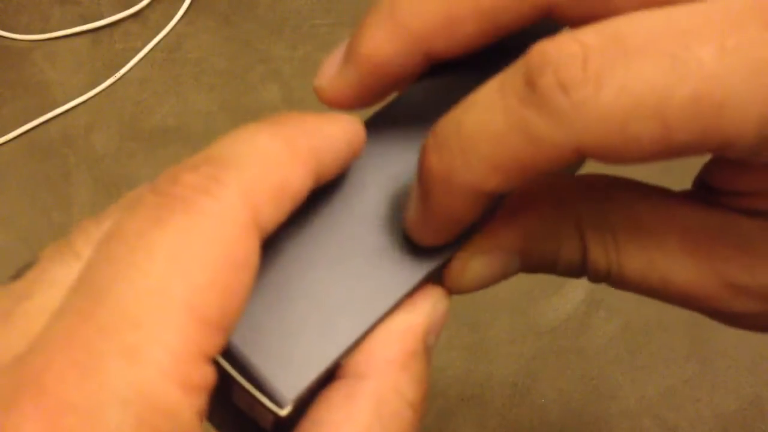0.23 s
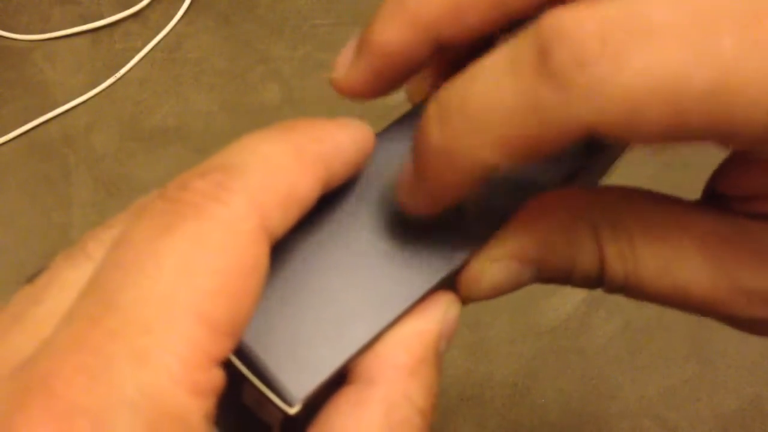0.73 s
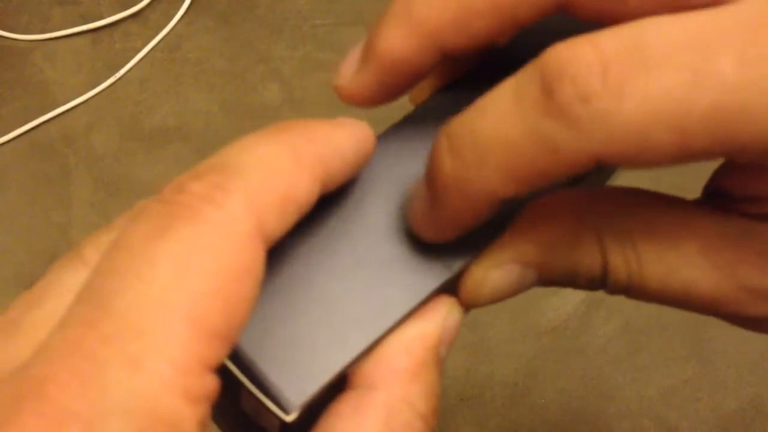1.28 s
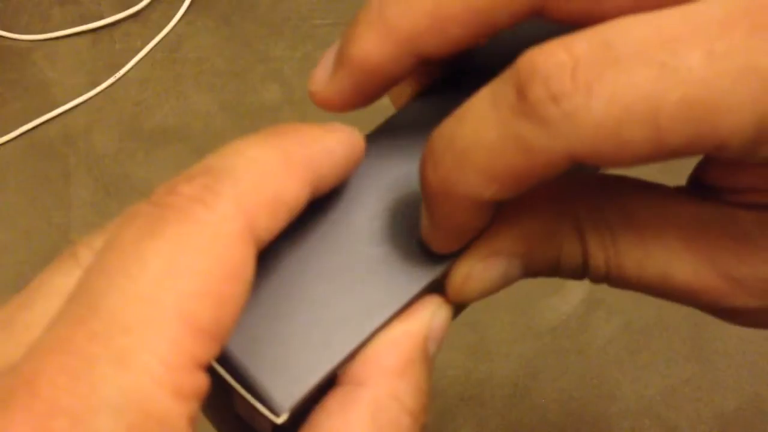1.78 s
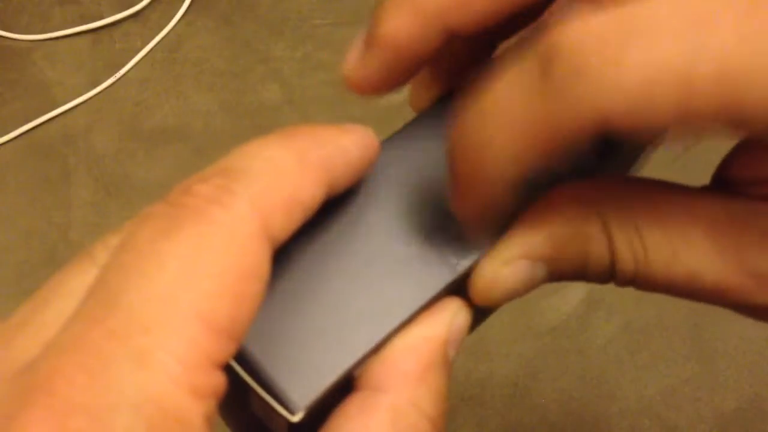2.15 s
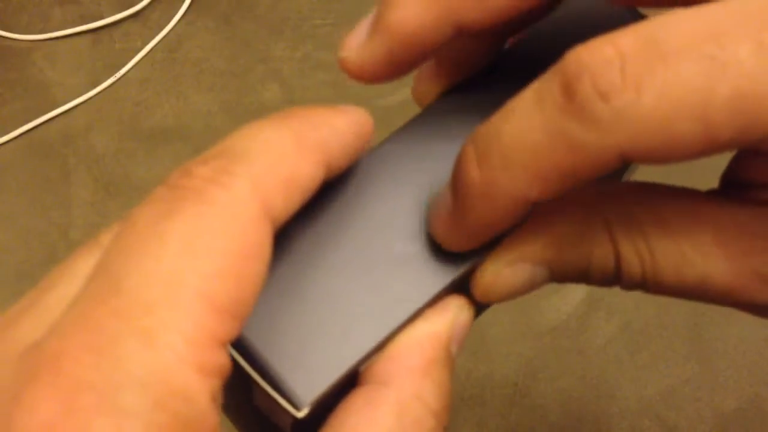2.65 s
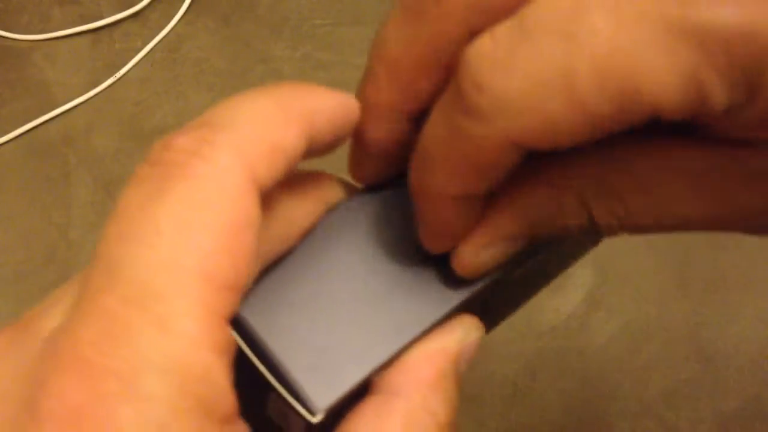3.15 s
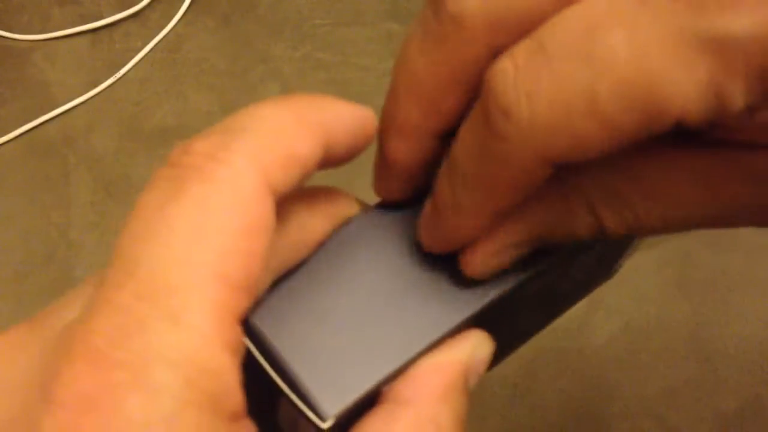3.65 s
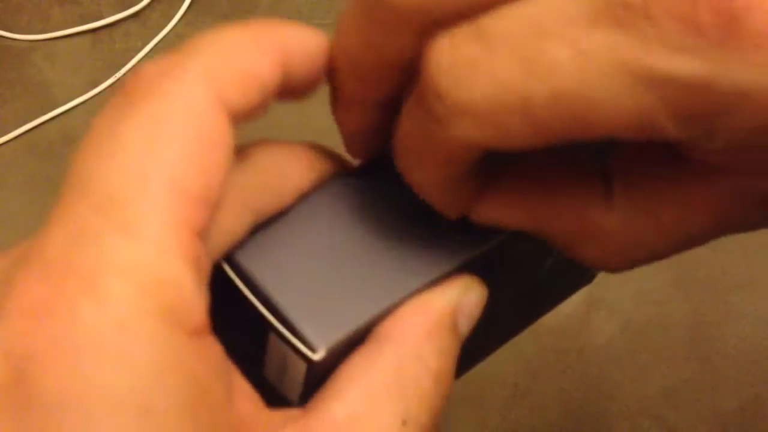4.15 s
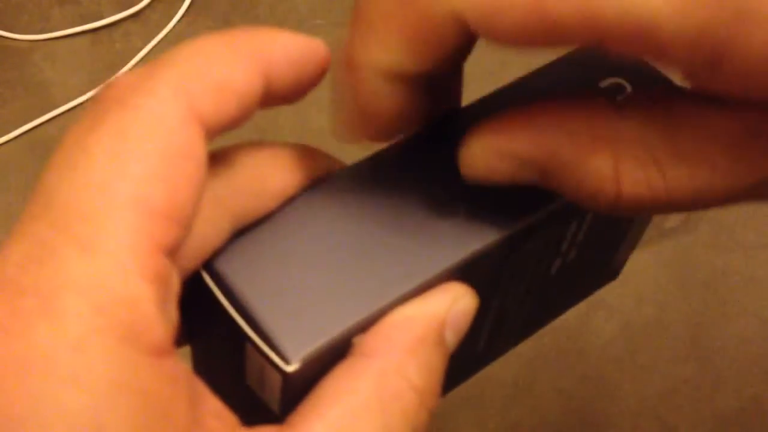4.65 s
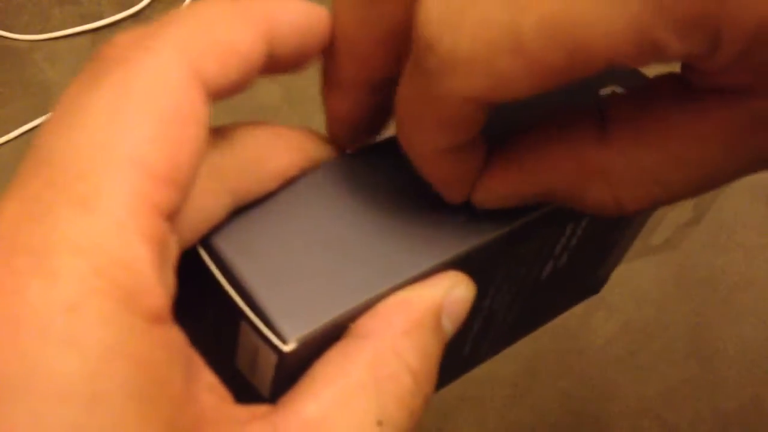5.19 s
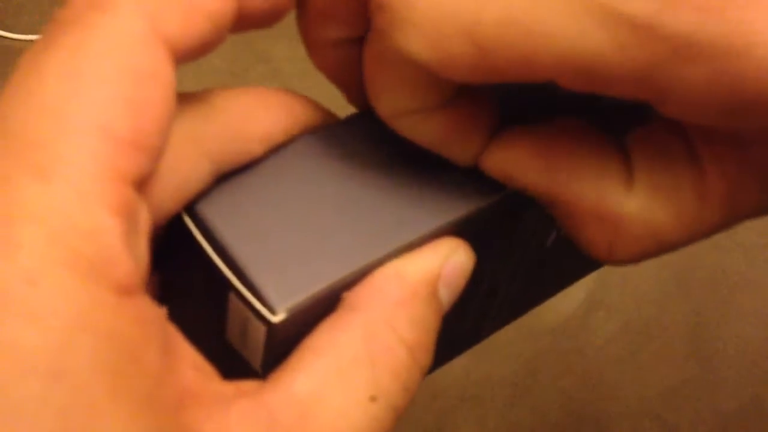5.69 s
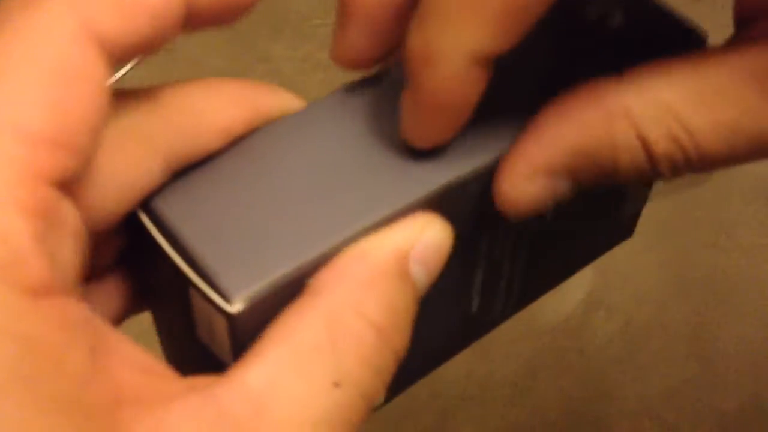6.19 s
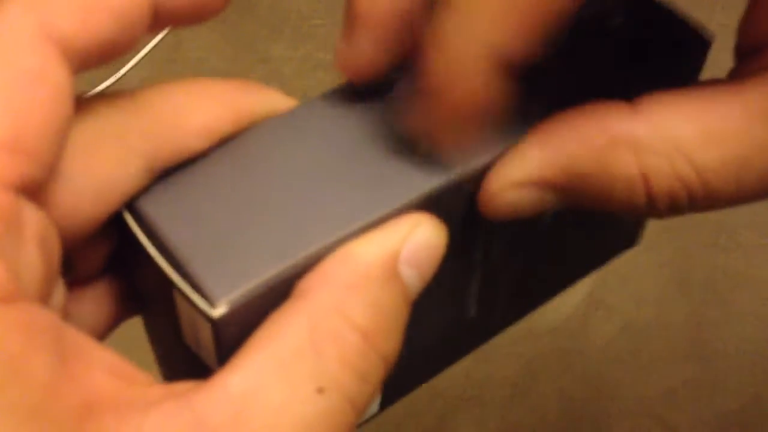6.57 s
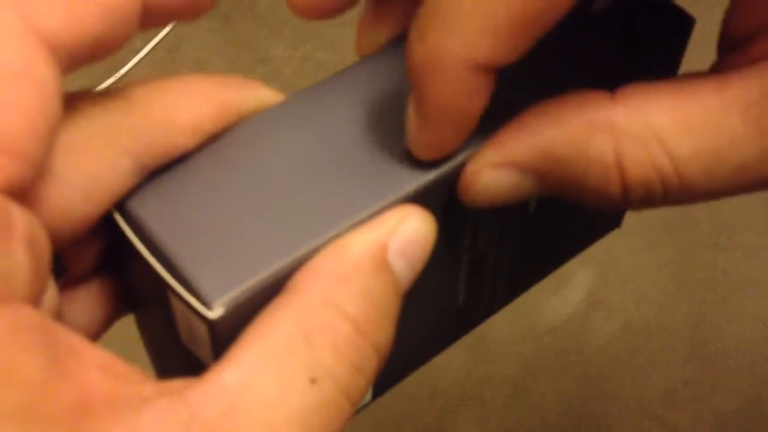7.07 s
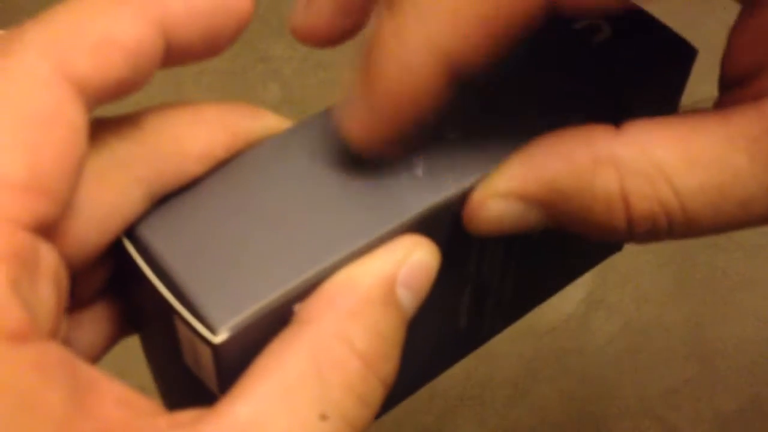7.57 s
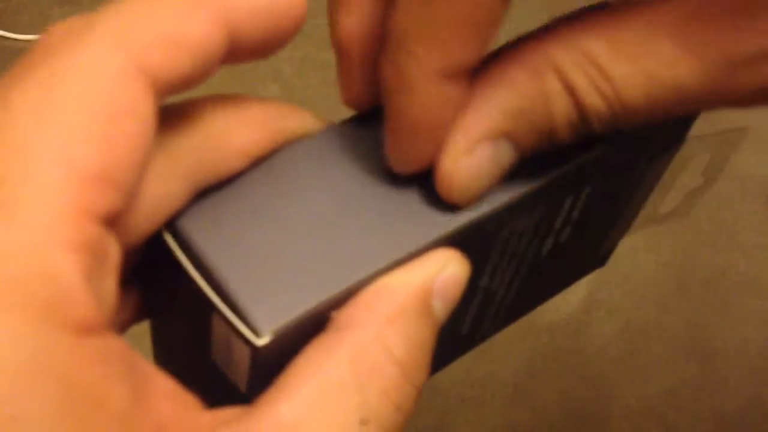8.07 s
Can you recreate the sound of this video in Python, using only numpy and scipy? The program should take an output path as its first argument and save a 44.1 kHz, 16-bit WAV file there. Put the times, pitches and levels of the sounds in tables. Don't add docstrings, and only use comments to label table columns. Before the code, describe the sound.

A close, dry indoor take of fingernails working at tape on a small cardboard box, over a steady soft hush. A few faint ticks open, then at 0.5 s a very loud, sharp snap with a short hollow card ring and slight room tail. Light scrapes lead to a weaker snap near 1.0 s, more scratches and ticks, and a firm, looser-sounding snap at 2.0 s with a dull bump. From 2.3 to 6 s it stays quiet: short raspy nail strokes, tiny clicks, a bright tick around 3.1 s, low rumbles of the palm near 3.5 to 4 s, and barely noticeable picks at 4.7 and 6.0 s. A strong double-hit snap comes at 6.4 s, followed by quick scratches and crisp ticks to 6.8 s. Another very loud crack hits at 7.3 s; the hush then dips slightly, with sparse faint scrapes until the end at 8.3 s.

```python
import sys
import numpy as np
from scipy import signal
from scipy.io import wavfile
from scipy.ndimage import uniform_filter1d

SR = 44100
rng = np.random.default_rng(int(sys.argv[2]) if len(sys.argv) > 2 else 0)


def rack_gain(trim_db):
    fader = np.asarray(trim_db, float)
    return 10 ** (fader / 20)


def transcribe(signal):
    frames = np.atleast_2d(signal).T
    limited = np.clip(frames, -1, 1)
    pcm = np.round(limited * 32767).astype(np.int16)
    wavfile.write(sys.argv[1], SR, pcm)


N = 367794

# (frequency [Hz], density [dB per Hz])
HUSH_SPECTRUM = [(18, -67.5), (30, -30), (59, -19.5), (143, 0), (216, 2), (552, -6.5), (928, -6.5),
                 (1170, -11.5), (1410, -9.5), (2250, -14.5), (3320, -10), (4900, -18), (7060, -16.5),
                 (10400, -26.5), (15000, -18.5)]
# (time [s], level [dB])
HUSH_LEVEL = [(0, 3), (2, 2), (4, 2.5), (7.278, 3.5), (7.4, -3), (7.9, -1.5), (8.34, 0)]
# (frequency [Hz], gain [dB])
MIC_RESPONSE = [(60, -40), (150, -14.5), (300, -4), (4200, 1.5), (4700, -7.5), (5050, -21), (5500, -3),
                (6100, 2), (15000, -1.5)]
# (frequency [Hz], t60 [s], level [dB])
ROOM_DECAY = [(150, 0.5, 6), (390.3, 0.24, 5), (990, 0.56, 0), (2670, 0.48, 8), (3944, 0.48, -1),
              (7000, 0.82, -8.5), (12000, 0.4, -10.5)]

# (time [s], skin motion [dB])
HAND_MOTION = [(0.0, -65), (0.5, -71), (0.79, -69.5), (1.44, -68.5), (1.9, -74.5), (2.25, -69),
               (2.8, -73.5), (3.39, -76.5), (3.9, -66.5), (4.32, -69), (4.8, -86), (5.25, -64.5),
               (5.95, -78), (6.55, -60), (7.0, -83), (7.45, -70), (7.83, -82), (8.34, -66.5)]
# (middle [s], length [s], deep rumble [dB], hollow rumble [dB])
PALM_SQUEEZES = [(0.0, 1, -85, -64.5), (1.412, 0.97, -68.5, -65.5), (2.048, 0.41, -81, -73),
                 (3.443, 0.77, -56.5, -69), (3.9, 0.89, -57.5, -90), (4.28, 0.74, -66, -65),
                 (5.438, 0.11, -63, -55.5), (6.24, 0.43, -83, -65), (6.625, 0.46, -80.5, -70.5),
                 (7.849, 0.84, -62.5, -94.5), (8.25, 0.99, -84, -71)]
# (time [s], peak [dB], frequency [Hz])
DULL_BUMPS = [(0.572, -20.5, 382), (2.021, -22.5, 378), (2.73, -39, 228), (2.732, -47.5, 520),
              (2.733, -47.5, 794), (5.423, -37, 300), (5.467, -48, 300), (6.18, -36, 210),
              (5.445, -41, 330), (6.393, -26, 420), (6.392, -18.5, 240), (7.74, -46, 453),
              (7.767, -41.5, 281)]
# (frequency [Hz], width [Hz], level [dB])
HOLLOW_RUMBLE = [(250, 260, 4.5), (368, 240, -2.5)]
DEEP_RUMBLE = [(149, 41, -3.5), (188, 40, -1.5)]
SKIN_RUB = [(360, 67, -1), (860, 430, 1), (1430, 460, -5.5), (1830, 400, -5)]

# (start [s], length [s], card [dB], nail hiss [dB])
EDGE_SCRAPES = [(0.04, 0.03, -56.5, -67.5), (0.64, 0.032, -72, -62), (0.872, 0.043, -61, -66.5),
                (0.984, 0.044, -59.5, -55), (1.111, 0.028, -61, -55), (2.01, 0.065, -62.5, -62.5),
                (2.317, 0.064, -73.5, -78), (2.404, 0.064, -73.5, -75.5), (2.851, 0.085, -73.5, -67.5),
                (3.262, 0.067, -65, -63.5), (3.396, 0.042, -79, -68), (3.444, 0.084, -76.5, -68.5),
                (3.537, 0.062, -68.5, -64.5), (3.592, 0.049, -67.5, -71), (3.76, 0.041, -61, -74),
                (3.817, 0.076, -67, -76), (3.952, 0.091, -73.5, -73.5), (4.037, 0.11, -74, -77),
                (4.761, 0.048, -70, -71), (4.828, 0.024, -71, -77), (4.906, 0.025, -70, -68),
                (4.985, 0.072, -61.5, -69.5), (6.172, 0.059, -58.5, -68.5), (6.393, 0.028, -58, -52),
                (7.32, 0.039, -58, -57), (7.74, 0.026, -70, -65.5), (7.987, 0.097, -68.5, -70.5)]
# (start [s], length [s], card [dB], nail hiss [dB])
WALL_SCRAPES = [(0.643, 0.028, -60, -61), (0.925, 0.023, -61, -69), (1.259, 0.022, -62, -71),
                (1.303, 0.052, -64, -76.5), (1.412, 0.011, -62, -76), (2.109, 0.042, -57.5, -60.5),
                (2.723, 0.031, -72.5, -64), (4.222, 0.025, -68.5, -81), (4.364, 0.042, -69, -76),
                (4.729, 0.0044, -60, -60.5), (4.96, 0.019, -60, -68.5), (5.148, 0.13, -69.5, -79),
                (5.421, 0.03, -64, -71.5), (6.028, 0.017, -61.5, -74), (6.4, 0.028, -54.5, -72),
                (6.432, 0.037, -54.5, -63.5), (6.478, .04, -63, -75), (3.77, 0.08, -70, -81),
                (2.03, .07, -59, -73.5), (2.17, .1, -71, -85), (6.548, 0.037, -58, -54.5),
                (6.765, 0.067, -71, -75), (7.422, 0.021, -58.5, -59.5), (7.594, 0.16, -70, -81.5),
                (8.258, 0.032, -64, -76.5)]
# (start [s], length [s], corner [dB], slick [dB])
FOLD_SCRAPES = [(0.87, .04, -68, -81), (1.128, 0.02, -62, -73), (3.29, 0.049, -84, -61.5),
                (3.395, .03, -79, -71.5), (3.455, 0.028, -78, -69), (3.75, 0.04, -60, -80),
                (3.818, 0.041, -65, -84), (4.83, 0.018, -71, -84), (4.91, 0.028, -69, -78),
                (4.96, 0.033, -68, -83), (5.008, 0.037, -58.5, -70), (5.058, 0.018, -73, -82),
                (2.856, 0.054, -76, -68.5), (3.546, 0.055, -69, -78), (3.256, 0.053, -65.5, -83),
                (6.182, 0.059, -65, -80)]
# (start [s], length [s], level [dB])
RIDGE_SCRAPES = [(0.989, .03, -54), (1.11, 0.025, -65), (3.255, 0.096, -68), (3.46, .03, -74),
                 (3.52, 0.1, -63), (3.823, .04, -69), (3.965, .09, -75), (4.762, .04, -72),
                 (4.906, .03, -64), (6.165, 0.064, -65), (6.556, 0.023, -59), (7.737, 0.028, -71)]
# (frequency [Hz], level [dB])
NAIL_HISS = [(2650, -42.5), (4500, -7.5), (5070, -17), (5830, -12), (6950, -0.5), (7550, -7), (8590, -7.5),
             (10600, -16), (11500, -26), (15500, -32.5)]
# (frequency [Hz], width [Hz], level [dB])
EDGE_RASP = [(2072, 170, 0.5), (2582, 320, 0), (3290, 290, 3), (3750, 240, -0.5)]
WALL_SCRATCH = [(420, 170, -10), (850, 220, 1), (1470, 330, 0), (1770, 300, -10)]
CORNER_MODES = [(1440, 180, -3.5), (2540, 160, -17), (3877, 174, 13.5)]
SLICK_MODES = [(7970, 350, -2.2), (9280, 1500, -5)]
RIDGE_MODES = [(6800, 280, -7), (7300, 250, -2)]
SIZZLE_MODES = [(11800, 3400, 0)]

# (time [s], peak [dB], nail brightness [dB], walls [dB], lower edge mode [dB])
TICK_EVENTS = [(0.041, -45, -8.5, -30, 2), (0.172, -39, -17, -8.5, 1), (0.427, -44, -25, -1, -4),
               (0.574, -42, -5, -30, -6), (0.781, -43, -22, -9, -1), (0.925, -47.5, -12, -2, -2),
               (0.966, -28, -20, -2, -8), (1.0, -36, -3, -25, -6), (1.226, -38, -20, -14.5, -3),
               (1.411, -43, -22, -11.5, 1), (1.79, -49.5, -20, -12.5, -6), (2.323, -44, -10, -3, -2),
               (2.732, -42.5, -3, -10, -3), (3.099, -37, 8, -43.5, -3), (3.394, -52, -8, -25, -4),
               (3.765, -40.5, -8, -22, -8), (3.905, -50, 0, -30, -4), (4.229, -49.5, -29, -18, 3),
               (4.289, -52, -3, -28, -6), (4.38, -52, -25, -18, -4), (4.727, -55, -9, -28, 0),
               (4.805, -47.5, -19, -14, -8), (4.886, -43, -23, -10.5, 0), (4.964, -55, -14, -22, -2),
               (5.085, -46, -27, -6, 0), (5.419, -46, -13, -6, -10.5), (6.034, -53, -16, -8.5, -2),
               (6.173, -39.5, -27, -2, -4), (6.447, -44, -10, -14, 0), (6.56, -34, -26, -2, 1),
               (6.576, -47, -26, -2, -6), (6.578, -30, -11, -25, -12), (6.679, -36.5, -21, -10, 0),
               (6.623, -59, 0, -37, -2), (6.816, -53, -3, -18, -1), (7.326, -29, -17, -9, -2),
               (7.6, -49, -15, -5, 1), (7.918, -56, 3.5, -13, -2.5)]
# (frequency [Hz], t60 [s], level [dB])
EDGE_MODES = [(2692, 0.0069, -2.5), (3140, 0.022, 0.5), (3883, 0.0053, -13)]
NAIL_MODES = [(5930, 0.0012, -1.5), (6830, 0.026, 3), (7944, 0.016, -10), (9700, .003, -21.5),
              (13500, .002, -12.5), (15190, 0.0016, -13.5)]
WALL_MODES = [(905, 0.01, 7.5), (1140, 0.0026, -3.5), (1442, 0.0033, -4)]
HOLLOW_MODES = [(330, 0.023, -7.5), (467, 0.034, 2)]

SNAP_TIMES = [.5314, .9764, 1.9952, 6.3864, 7.2841, 4.7291, 6.0208]
# (peak [dB], rebound delay [ms], rebound [dB], slow ring [dB], room [dB])
SNAP_BLOWS = [
    (1.5, 1.37, -13.5, 2, -16),
    (-14.5, 1.37, -6, 6, -15),
    (-4.5, 0.731, -8.5, 13.5, -20),
    (-8.5, 0.5, 10.5, -6, -11.5),
    (1, 2.9, -15.5, -0.5, -15.5),
    (-35, 1.12, -7.5, 0, -16),
    (-33, 1.94, -1, 7, -14),
]
SNAP_RISES = [.15, .2, .6, .45, .15, .8, .6]
SNAP_DAMPING = [1.3, 1.5, 1.56, 1.5, 1.5, 1.3, 1.1]
# (delay [ms], level [dB])
SECOND_REBOUNDS = [(2.3, -20.5), (2.7, -34), (2.4, -19), (3.0, -9), (2.5, -19), (3.1, -18), (4.3, -18)]
HAND_SHADE = [-1.2, -16, -18, -0.5, -3, -3.5, -2]
ECHO_SHARE = [-0.5, -1.5, 0, 10.5, -4, -13, 6]
RING_TO_ROOM = [-20, -14, -5, -14, -16.5, -14, -12]
# (delay [ms], level [dB])
NEAR_ECHOES = [(2.4, -6), (4.1, -10.5), (6.3, -16), (9.6, -22.5), (11.4, -20.5)]
# (frequency [Hz], width [Hz], level [dB])
FIRM_GRIP = [(382, 65, 2.5), (870, 190, 3.5), (1547, 200, 1), (2150, 200, -12.5), (1150, 330, -5.5),
             (3100, 290, -0.5), (3480, 120, -9), (6440, 150, -13), (6850, 150, -9.5), (7060, 220, -3.5),
             (8000, 200, -13.5), (9100, 150, -13), (9900, 240, -23.5), (12900, 300, -41)]
LIGHT_GRIP = [(390, 94, 17), (920, 185, 18.5), (1590, 260, -38), (3130, 34, 8), (3720, 42, -1),
              (7120, 130, -2), (7530, 500, 2), (9180, 110, -27), (9490, 110, -27), (13700, 280, -28)]
LOOSE_GRIP = [(436.5, 87.6, 7.5), (807, 140, 5.5), (974, 160, 2), (1480, 300, 1.5), (2173, 65, 1),
              (2990, 390, -6), (3300, 110.3, -6.5), (3740, 113, -7.5), (6080, 82, 0), (6960, 73, -10),
              (7100, 110, -6), (8300, 220, -6), (9730, 290, -10), (12200, 340, -17)]
TILTED_BOX = [(520, 130, 0.5), (960, 140, 10), (1300, 160, 6), (1570, 140, -7), (2240, 50, -32),
              (2970, 46, -15), (3280, 53, 3.5), (3620, 35, -5), (6300, 260, -12.5), (6880, 60, -5),
              (6900, 50, -10), (7600, 41, -17), (8800, 340, -10.5), (9550, 230, -18)]
PRESSED_BOX = [(300, 200, -17), (886, 61, 4), (1200, 330, -1.5), (1530, 260, 1), (2760, 100, -5.5),
               (2970, 71, -4), (3200, 170, -2), (3700, 57, -0.5), (6400, 130, -3), (7060, 120, -5.5),
               (7500, 67, -8), (8090, 240, -5.5), (9150, 170, -14), (10450, 130, -17.5)]
PICKED_BOX = [(241, 67, -3), (834, 140, -3.5), (1580, 110, -7), (2570, 120, 2.5), (3330, 110, -3),
              (3660, 150, -16), (5810, 140, -15), (6760, 150, -11), (7030, 180, -2), (7900, 180, -3),
              (9160, 110, -13)]
TAPPED_BOX = [(473, 110, 1.5), (956, 130, 2.5), (1390, 150, -3), (2570, 130, -2), (3180, 250, -15),
              (6350, 140, -12), (6880, 150, -3), (7570, 110, -14), (7990, 110, -16), (9820, 250, -21)]
SNAP_MODES = [FIRM_GRIP, LIGHT_GRIP, LOOSE_GRIP, TILTED_BOX, PRESSED_BOX, PICKED_BOX, TAPPED_BOX]


def evened(x):
    return x / np.sqrt(np.mean(x ** 2) + 1e-20)


def read(f, value, hz):
    return np.interp(np.log(hz + 1), np.log(np.asarray(f) + 1), value)


def add(mix, s, sound):
    part = mix[round(s * SR):][:len(sound)]
    part += sound[:len(part)]


def colour(x, points):
    half = np.log(rack_gain(read(*np.transpose(points), np.fft.rfftfreq(4096, 1 / SR))))
    whole = np.concatenate([half, half[-2:0:-1]])
    response = np.fft.ifft(np.exp(np.conj(signal.hilbert(whole)))).real[:2048]
    return signal.oaconvolve(x, response)[:len(x)]


def body(x, modes):
    out = np.zeros(len(x))
    for k, (hz, width, db) in enumerate(modes):
        b, a = signal.iirpeak(hz, hz / (1.63 * width), SR)
        once = signal.lfilter(b, a, x)
        out += (-1) ** k * rack_gain(db) * signal.lfilter(b, a, once)
    return evened(out)


def grit(per_s, spread_db):
    size = rack_gain(spread_db * np.minimum(rng.exponential(1, N), 4)) * rng.standard_normal(N)
    return size * (rng.random(N) < per_s / SR)


def wander(x, depth_db):
    z = signal.stft(x, nperseg=256)[2]
    patches = rng.standard_normal(z.shape[::-1]).T
    patches = uniform_filter1d(patches, size=5, axis=0)
    patches = evened(uniform_filter1d(patches, size=7, axis=1))
    gain_db = depth_db * patches - .115 * depth_db ** 2
    return signal.istft(z * rack_gain(gain_db), nperseg=256)[1][:len(x)]


def stroke_shape(length):
    phase = np.linspace(0, 1, round(1.69 * length * SR)) ** 0.91
    return np.sin(np.pi * phase) ** 1.4


def hush():
    drift_db = np.interp(np.arange(N) / SR, *np.transpose(HUSH_LEVEL))
    return rack_gain(-67.5 + drift_db) * evened(colour(rng.standard_normal(N), HUSH_SPECTRUM))


def room_tail():
    taps = np.zeros(SR // 2)
    at = np.arange(260, len(taps) - 12, 12)
    taps[at + rng.integers(0, 12, len(at))] = rng.choice([-1., 1.], len(at))
    taps *= 1 - np.exp(-np.arange(len(taps)) / SR / 0.0059)
    hz, t, z = signal.stft(taps, SR, nperseg=256)
    f, t60, db = np.transpose(ROOM_DECAY)
    z = z * rack_gain(read(f, db, hz)[:, None] - 60 * t / read(f, t60, hz)[:, None])
    tail = signal.istft(z, SR, nperseg=256)[1]
    return tail / np.linalg.norm(tail)


def hands():
    now, t = np.arange(N) / SR, np.arange(4000) / SR
    motion = rack_gain(np.interp(now, *np.transpose(HAND_MOTION)))
    middle, length, deep_db, hollow_db = np.transpose(PALM_SQUEEZES)[:, :, None]
    swells = np.exp(-8 * ((now - middle) / length) ** 2)
    hollow = rack_gain(-87) + rack_gain(-12) * motion + (rack_gain(hollow_db) * swells).sum(0)
    deep = rack_gain(-74.5) + (rack_gain(deep_db) * swells).sum(0)
    out = hollow * body(grit(per_s=2700, spread_db=1.0), HOLLOW_RUMBLE)
    out += deep * body(rng.standard_normal(N), DEEP_RUMBLE)
    out += motion * body(grit(per_s=1800, spread_db=0.5), SKIN_RUB)
    for s, db, hz in DULL_BUMPS:
        envelope = rack_gain(db - 60 * t / 0.039) * (1 - np.exp(-t / 0.0026))
        add(out, s, envelope * np.sin(2 * np.pi * hz * t))
    return out


def stroke_pressure():
    pressure = np.zeros((6, N))
    for rows, rasp_db, scratch_db in [(EDGE_SCRAPES, -0.17, 0.16), (WALL_SCRAPES, -5, 0.16)]:
        for s, length, card_db, nail_db in rows:
            for layer, db in zip(pressure, [nail_db, card_db + rasp_db, card_db + scratch_db]):
                add(layer, max(s - 0.35 * length, 0), rack_gain(db + 3.0) * stroke_shape(length))
    for s, length, *levels_db in FOLD_SCRAPES:
        for layer, db in zip(pressure[3:], levels_db):
            add(layer, s - 0.39 * length, rack_gain(db + 0.5) * stroke_shape(length))
    for s, length, db in RIDGE_SCRAPES:
        add(pressure[5], s - 0.24 * length, rack_gain(db) * stroke_shape(length))
    judder_db, judder_s = 2.2, .005
    judder = uniform_filter1d(rng.standard_normal((2, N)), size=round(judder_s * SR), axis=1)
    return pressure * rack_gain(judder_db * evened(judder))[[0, 1, 1, 1, 0, 0]]


def strokes():
    pressure = stroke_pressure()
    slips = grit(per_s=9400, spread_db=2.2)
    wandering = [evened(colour(slips, NAIL_HISS)), body(slips, EDGE_RASP), body(slips, WALL_SCRATCH)]
    layers = [wander(layer, depth_db=2.1) for layer in wandering]
    layers += [body(slips, modes) for modes in [CORNER_MODES, SLICK_MODES, RIDGE_MODES]]
    sizzle = pressure[0] ** 2 / rack_gain(-36.5) * body(slips, SIZZLE_MODES)
    return sizzle + (pressure * layers).sum(0)


def ticks():
    out, t = np.zeros(N), np.arange(1500) / SR
    parts = [EDGE_MODES[:1], EDGE_MODES[1:], NAIL_MODES, WALL_MODES, HOLLOW_MODES]
    sizes = [len(p) for p in parts]
    hz, t60, mode_db = np.transpose(sum(parts, []))[:, :, None]
    luck = .03 * rng.standard_normal((len(TICK_EVENTS), len(hz), 1))
    slips = .12 * rng.standard_normal((len(TICK_EVENTS), 120)) ** 3 * np.exp(-t[:120] / .001)
    click = np.diff(np.exp(-(t[:40] / .00007 - 3) ** 2), prepend=0) * 3
    add(out, 6.5795, rack_gain(-31.5) * np.sin(2 * np.pi * 14200 * t) * np.exp(-t / .0004))
    damped_s = .006
    fall_db = -60 * t / np.minimum(t60, np.maximum(damped_s, 10 / hz))
    decay = rack_gain(fall_db) + rack_gain(4 + 6 * fall_db)
    rise = 1 - np.exp(-hz * t / 0.41)
    for (s, db, nail_db, walls_db, lower_db), detune, slip in zip(TICK_EVENTS, luck, slips):
        levels_db = [lower_db, 0, nail_db + 15.5, walls_db + 16, walls_db + 12]
        part_db = np.repeat(levels_db, sizes)[:, None]
        tones = np.sin(2 * np.pi * hz * (1 + detune) * t)
        ring = (rack_gain(mode_db + part_db) * decay * tones * rise).sum(0)
        tick = ring + np.convolve(ring, slip)[:len(t)]
        add(out, s + 0.0012, rack_gain(db) * tick / abs(tick).max())
        add(out, s + 0.0012, rack_gain(db - 8.5) * click)
    return out


def near_echo(crack, t):
    smear = rng.standard_normal(200) * np.exp(-t[:200] / .0012)
    smear -= uniform_filter1d(smear, size=70)
    return np.convolve(crack[:200], smear / np.linalg.norm(smear))


def snaps():
    out, t = np.zeros(N), np.arange(3000) / SR
    shade_filter = signal.butter(N=6, Wn=2260, fs=SR)
    for i, (db, rebound_ms, rebound_db, ring_db, room_db) in enumerate(SNAP_BLOWS):
        s = SNAP_TIMES[i]
        late_ms, late_db = SECOND_REBOUNDS[i]
        hz, width, mode_db = np.transpose(SNAP_MODES[i])[:, :, None]
        fast = np.exp(-np.pi * 4.5 * width * t)
        slow = np.exp(-np.pi * SNAP_DAMPING[i] * width * t)
        decay = fast + rack_gain(ring_db) * slow
        blow = (rack_gain(mode_db) * width * decay * np.sin(2 * np.pi * hz * t)).sum(0)
        crack = blow * (1 - np.exp(-t / .0001)) * np.exp(-t / 0.00034)
        blow *= 1 - np.exp(-1000 * t / SNAP_RISES[i])
        rebound = rack_gain(rebound_db) * np.interp(t - rebound_ms / 1000, t, blow, left=0)
        late = rack_gain(late_db) * np.interp(t - late_ms / 1000, t, blow, left=0)
        blow = blow + rebound + late
        scale = rack_gain(db) / abs(blow).max()
        add(out, s, scale * blow)
        for ms, echo_db in NEAR_ECHOES:
            arrival = s + ms / 1000 * rng.uniform(.9, 0.99)
            add(out, arrival, scale * rack_gain(echo_db + ECHO_SHARE[i]) * near_echo(crack, t))
        lows = signal.lfilter(*shade_filter, crack)
        sent = lows + rack_gain(HAND_SHADE[i]) * (crack - lows) + rack_gain(RING_TO_ROOM[i]) * blow
        add(out, s, scale * rack_gain(room_db) * signal.fftconvolve(sent, room_tail()))
    return out


def scene():
    small = hands() + strokes() + ticks()
    reverberant = rack_gain(-18) * signal.fftconvolve(small, room_tail())[:N]
    return (snaps() + small + reverberant)[None]


def low_pass(x):
    return signal.sosfilt(signal.butter(12, 16450, fs=SR, output="sos"), x)


def record(dry):
    full = np.clip(colour(dry[0], MIC_RESPONSE) + hush(), -.94, .94)
    edge = signal.firwin(301, 15250, window=("kaiser", 4), fs=SR)
    heard = signal.oaconvolve(full, edge, "same")
    over = full - heard
    strong = uniform_filter1d(abs(over), size=64) > rack_gain(-58)
    passing = uniform_filter1d(1. * strong, size=128)
    heard = heard + rack_gain(-8.5) * over * passing
    return low_pass(heard[None])


dry = scene()
out = record(dry)
transcribe(out)
```